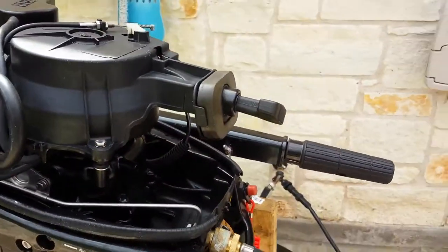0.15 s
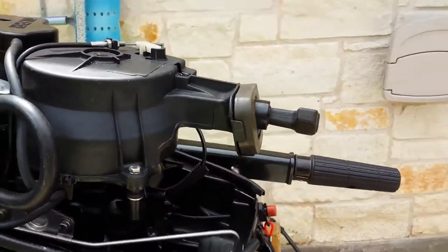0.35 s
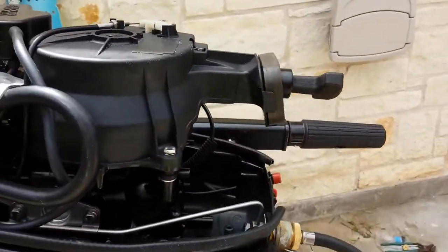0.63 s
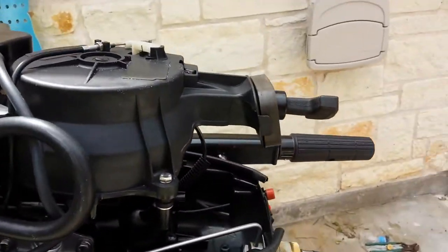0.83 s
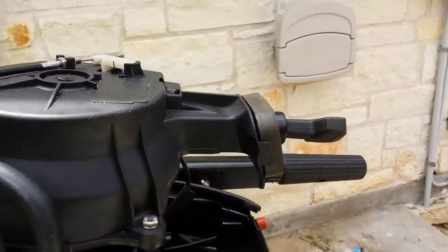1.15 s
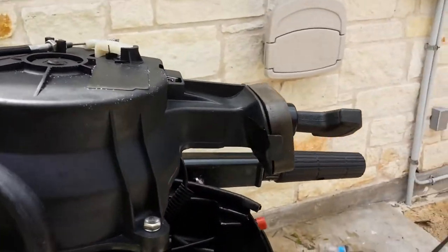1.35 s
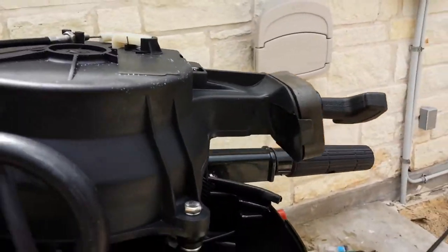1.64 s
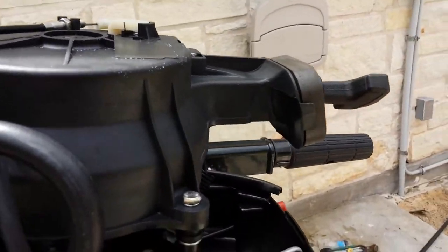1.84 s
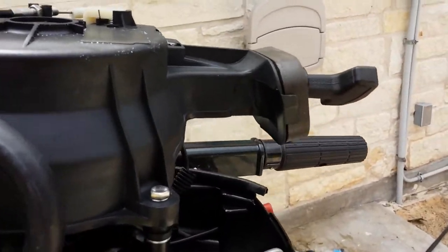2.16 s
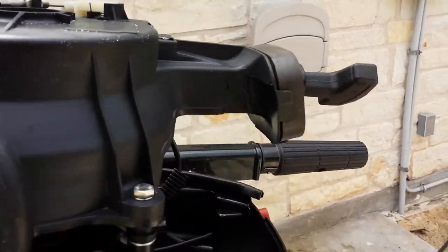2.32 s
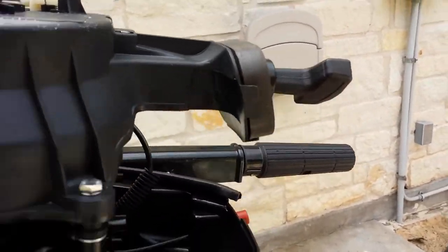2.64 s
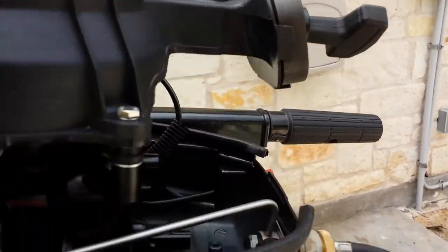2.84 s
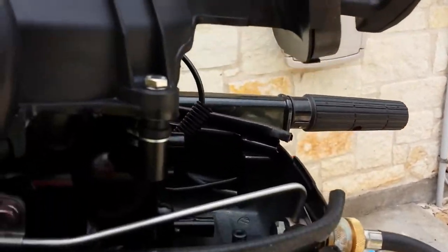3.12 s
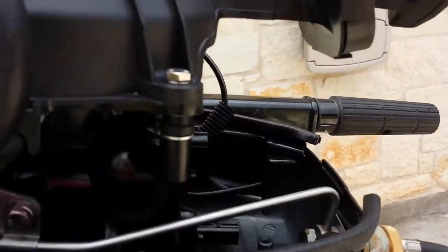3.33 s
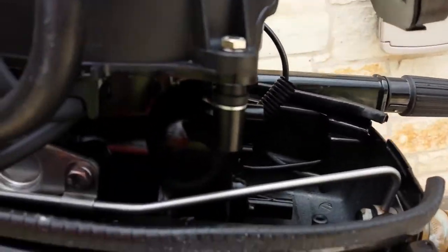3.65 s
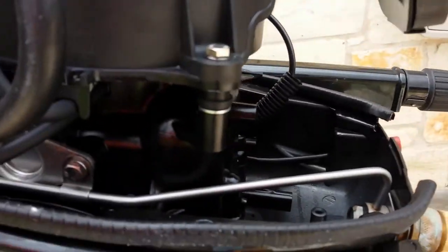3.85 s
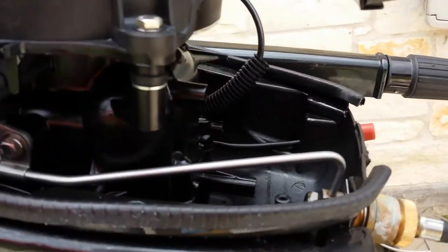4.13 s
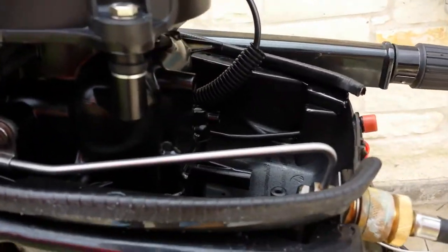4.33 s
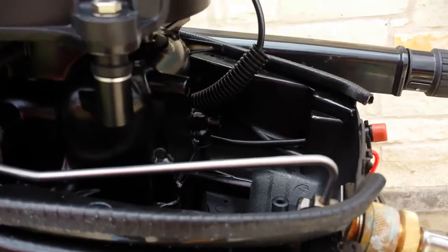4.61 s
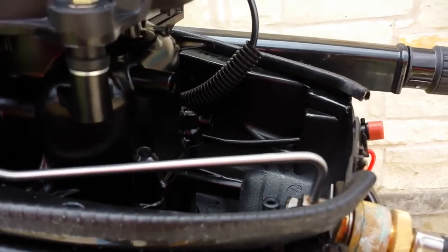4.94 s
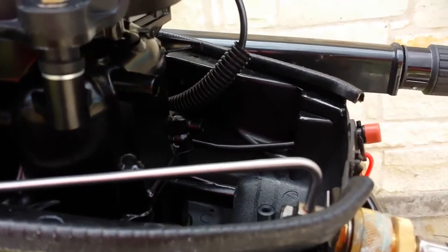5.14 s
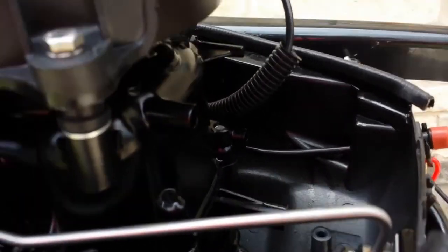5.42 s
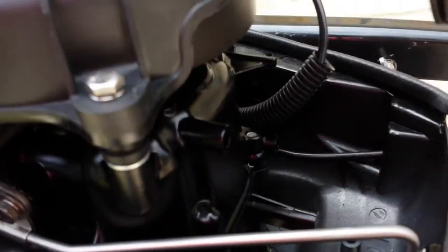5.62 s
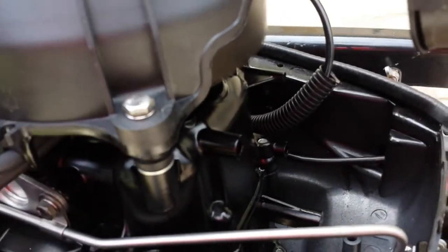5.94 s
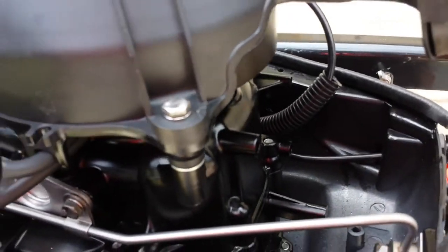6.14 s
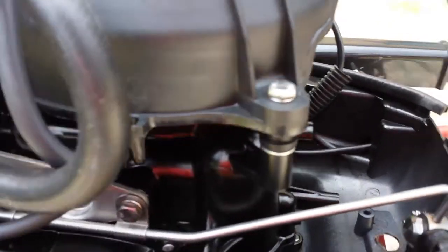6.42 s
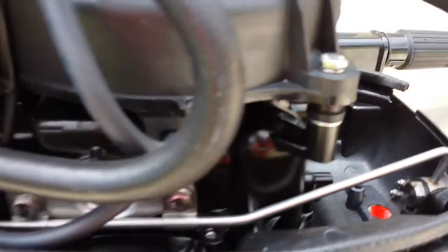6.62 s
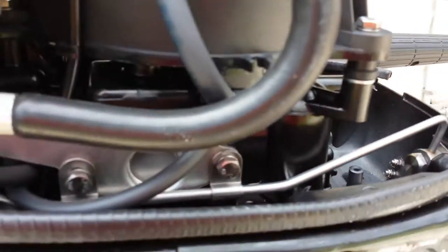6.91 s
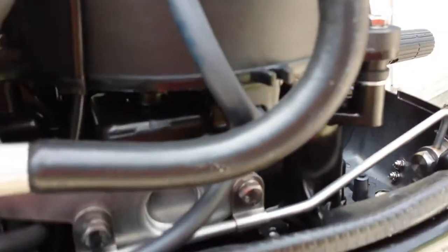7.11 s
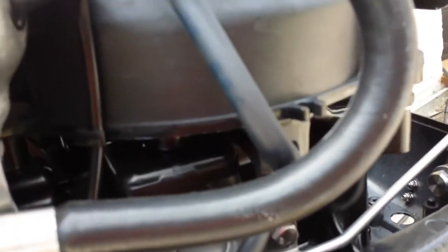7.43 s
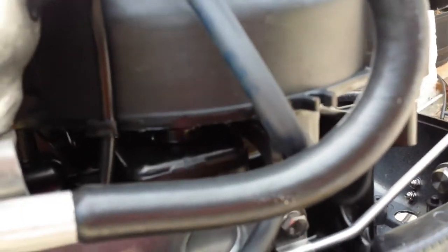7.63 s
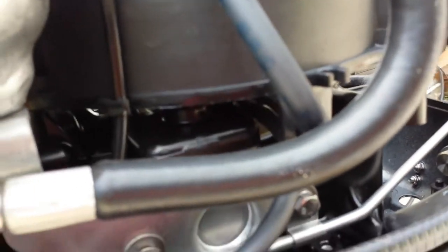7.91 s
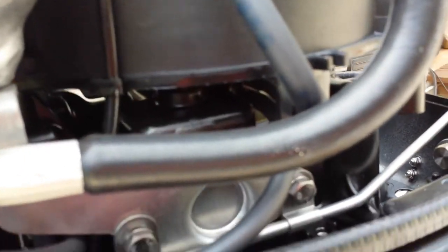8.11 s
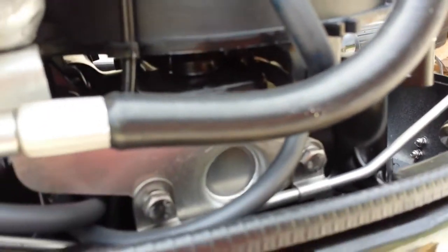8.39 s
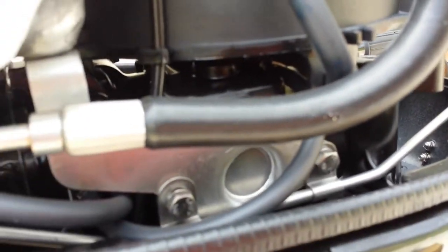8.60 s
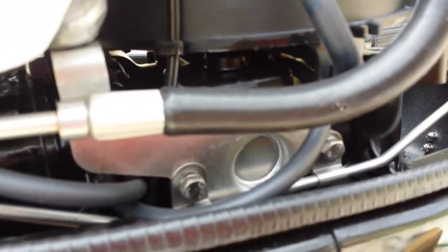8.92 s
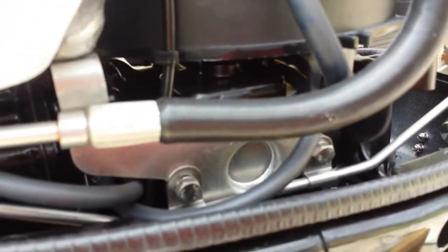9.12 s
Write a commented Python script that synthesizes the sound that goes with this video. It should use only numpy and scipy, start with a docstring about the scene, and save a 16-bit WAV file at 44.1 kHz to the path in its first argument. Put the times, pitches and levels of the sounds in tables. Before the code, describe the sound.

A small outboard engine idles steadily with a fast metallic clatter, ticking valves and a hiss, heard up close.

```python
"""A fast metallic clatter: a small four-stroke outboard idles with its cover off.
Piston, gears and valves strike at fixed points of every cycle and excite the resonances of the block.
Cooling water and intake air hiss, and periodic exhaust puffs hum in the leg. A hand-held microphone
with two ports moves round the engine past six viewpoints (0-5); two dull taps fall on its case."""
import sys
import numpy as np
from scipy import signal
from scipy.fft import rfft, irfft
from scipy.io import wavfile
from scipy.ndimage import uniform_filter1d

SR = 44100
rng = np.random.default_rng(int(sys.argv[2]) if len(sys.argv) > 2 else 0)


def generate_wav(signal):
    """Clip the signal to [-1, 1] and save it as 16-bit WAV at the path in sys.argv[1]."""
    frames = np.transpose(np.atleast_2d(signal))
    scaled = np.clip(frames, -1, 1) * 32767
    pcm = np.round(scaled).astype(np.int16)
    wavfile.write(sys.argv[1], SR, pcm)


N = 408366
FFT_SIZE = 8192
HZ = np.arange(FFT_SIZE // 2 + 1) * SR / FFT_SIZE


# Impacts on the block: (phase [cycles], level at each viewpoint [dB])
BLOCK_IMPACTS = [(-0.108, 0.9, 3.9, 9.6, 1.0, 7.5, 10.0), (-0.048, 7.8, 7.8, 7.7, 6.8, 5.1, 6.6),
                 (0.067, 3.2, 3.0, 6.8, -0.7, -3.2, 3.7), (0.125, -8.9, -6.6, 3.4, 2.2, 2.9, 5.7),
                 (0.207, 7.4, 4.1, 8.4, 4.4, 4.9, 7.8), (0.267, 4.2, -1.3, 6.4, 10.1, 1.4, 7.1),
                 (0.317, 1.7, -10.1, -20.0, -20.0, -0.1, -0.3), (0.5, 0.1, -3.5, 0.6, 2.6, -4.0, 0.7),
                 (0.551, 4.7, 1.5, 4.6, 0.7, -2.3, -4.3), (0.602, 9.2, 6.1, 8.5, 6.5, 4.4, 4.2),
                 (0.694, -1.7, -1.7, 0.9, 2.3, -3.6, 0.4), (0.852, -20.0, -0.3, -7.5, -20.0, -0.7, 3.4)]
# Block response, one curve a viewpoint: (frequency [Hz], gain [dB])
BLOCK_SPECTRA = [
    [(140, -45), (230, -19), (499, -16.5), (562, -21), (761, -6), (1010, -6.5), (1280, -1), (2400, -5),
     (3120, -34), (5280, -120)],
    [(140, -49), (230, -20.5), (361, -23), (562, -20), (1270, -3.5), (1900, -8.5), (1990, 3.5),
     (2400, -14.5), (3120, -22), (5280, -120)],
    [(140, -45), (230, -14), (280, -24), (312, -25.5), (754, -11.5), (1130, -8.5), (1510, 1.5), (2400, -7),
     (3120, -29), (5280, -120)],
    [(140, -58), (230, -20.5), (485, -19), (684, -13), (761, -8.5), (1000, -11), (1590, -0.5), (2400, -4),
     (3120, -19), (5280, -120)],
    [(140, -60), (230, -23), (475, -20), (732, -14), (1060, -5.5), (1160, -5), (2090, 0), (2400, -7),
     (3120, -15), (5280, -120)],
    [(140, -46), (230, -17), (530, -17), (1030, -2.5), (1170, -10.5), (1500, 3), (1620, -1), (2400, -3),
     (3120, -22), (5280, -120)],
]
# Peaks and dips of the castings: (frequency [Hz], width [Hz], gain at each viewpoint [dB])
CASTING_MODES = [(318, 41, -10, 1.5, 7, 5, -1, -1), (496, 28, 10, 1.5, 0.5, 2, 11, 4.5),
                 (797, 35, 4, 3.5, 3, 3.5, 2, 1.5), (1078, 51, 8.5, 9, 6, 7, 12, 8.5),
                 (1108, 100, -6, -7, -3, -0.5, -13, 0.5), (1288, 55, 6, -1, 2, 1.5, -2, 0),
                 (1653, 100, 11, 2, 0.5, 3, -2, 0.5), (2144, 16, 15, -3, 12.5, 4, 1, 1),
                 (2334, 25, 13, 13.5, 6, 6, 8, -3), (1256, 44, 1, 5, 4.5, 6, 6.5, 8),
                 (1550, 150, -1, 5, 0.5, 2.5, 4, 2), (1820, 26, 9, 14, -14, -0.5, 6, -1.5),
                 (1908, 51, 3, -27, -10, -13, -11, -11), (2120, 48, 5.5, 3, 5.5, 9.5, 8, 8)]
# Ring of the plate: (time [s], level [dB])
PLATE_LEVEL = [(0, -34), (.55, -31), (.69, -23.5), (.8, -28), (1.0, -21), (1.2, -20), (1.33, -22),
               (1.41, -26), (1.7, -23.5), (1.99, -20.5), (2.15, -26), (2.4, -26.5), (2.55, -24),
               (2.71, -33), (2.9, -24), (3.45, -35), (3.85, -25), (4.1, -32), (5.0, -34), (6.2, -30),
               (6.6, -30), (6.85, -24.5), (7.05, -18.5), (7.4, -26), (7.6, -31), (8.1, -27), (8.7, -25),
               (9.03, -19.5), (9.26, -23)]

def block(cycles, block_db, plate_hz=2032, plate_width_hz=14):
    """Impact excitation: piston and gears knock the castings, and one thin plate resonates."""
    knocks = impacts(cycles, BLOCK_IMPACTS, spread_db=1, click_db=11, steady_db=-3.5,
                     rise_s=.0028, t60=.024, repeats=from_db(-11) * cyclic_noise(cycles))
    shaking = rng.standard_normal((2, N)) + from_db(-5) * cyclic_noise(cycles, memory=.9)
    force = knocks + butterworth(shaking, 2, 750, "low")   # the casing shakes evenly below the knocks
    low_trim_db = -4 / (1 + (HZ / 950) ** 3)   # turns down the low drone of the knocks and shaking
    body = radiate(force, with_peaks(BLOCK_SPECTRA, CASTING_MODES) + low_trim_db)
    radius, angle = np.exp(-np.pi * plate_width_hz / SR), 2 * np.pi * plate_hz / SR
    ring = signal.lfilter([1, 0, -1], [1, -2 * radius * np.cos(angle), radius ** 2], force[0])
    ring = unit_rms(ring / uniform_filter1d(ring ** 2, SR // 16) ** .38)   # evens out the ring
    ring_db = in_time(PLATE_LEVEL)[0] + 1.4 * drift(3.9)   # it comes in bursts
    return from_db(block_db + 2) * body + from_db(ring_db) * ring * from_db([[4], [-12.5]])


# Valve impacts: (phase [cycles], level at each viewpoint [dB])
VALVE_IMPACTS = [(-0.088, 4.0, 4.0, 3.0, 7.0, 4.0, 2.0), (-0.03, 5.8, 5.9, 6.7, 2.1, 5.3, 5.4),
                 (-0.005, 9.6, 7.6, 9.3, 14.2, 9.1, 4.9), (0.015, 4.8, -3.7, 7.7, -20.0, 7.3, 8.5),
                 (0.075, 0.2, -1.5, -19.9, 0.3, -5.3, 0.0), (0.195, 2.7, -1.8, 2.1, 7.4, 3.3, 4.7),
                 (0.229, 2.9, 2.9, 4.7, -0.9, -0.7, -9.4), (0.53, 4.6, 3.3, 4.7, 9.7, 5.8, 5.1),
                 (0.655, -3.3, -1.4, 1.2, 3.0, -0.2, 0.3), (0.69, 2.5, -5.2, 3.6, 6.0, 2.9, 5.0),
                 (0.73, -0.7, 3.0, 0.4, 0.5, 0.3, -22.0), (0.8, 0.0, 1.0, 0.0, 5.0, 2.0, 5.0)]
# Valve gear response, one curve a viewpoint: (frequency [Hz], gain [dB])
VALVE_SPECTRA = [
    [(1290, -23), (2200, 5.5), (2400, -2), (2500, 3), (3100, 0), (3360, 0), (3580, 1), (4600, -8),
     (5980, -32), (10100, -120)],
    [(1290, -43), (2200, -4), (2600, -1), (2950, -12), (3220, -7.5), (3650, -7), (4030, -25), (4600, -19),
     (5980, -30), (10100, -120)],
    [(1290, -40.5), (2200, -3.5), (2410, -7), (2620, 1.5), (3060, -7.5), (3550, -7), (3830, -8),
     (4600, -19), (5980, -35), (10100, -120)],
    [(1290, -24), (2200, -8), (2460, 5.5), (2590, -11), (2980, 4), (3470, 0), (3930, -14.5), (4600, -15.5),
     (5980, -13), (10100, -120)],
    [(1290, -27), (2200, -14), (2580, 1.5), (2860, -6), (3130, -4), (3640, -0.5), (4140, -18), (4600, -8.5),
     (5980, -41), (10100, -120)],
    [(1290, -33.5), (2200, 0), (2560, -9), (2760, -7), (3200, -1), (3460, -4), (3760, -7), (4600, -17.5),
     (5980, -24), (10100, -120)],
]
# Peaks and dips of valve gear and airways: (frequency [Hz], width [Hz], gain at each viewpoint [dB])
UPPER_MODES = [(2560, 110, -7, 0, 1.5, -4, -1, 6.5), (2830, 100, -3, 1, -8, 0, -5, -1),
               (3150, 76, 2, 4, 4.5, -5, 4, 3.5), (3420, 100, 3, -3, -4, 4.5, -10, -5.5),
               (3680, 400, 1.5, 2, 4, 8.5, -0.5, 3.5), (5460, 98, -8, 3, -11, -5, 0, 5),
               (6480, 440, 0.5, 10.5, -2.5, -0.5, 7.5, -1), (11270, 900, 3, -3, -17, 3, 12, 11.5)]
# Valve gear: (level at each viewpoint [dB])
VALVE_LEVELS = [-24.5, -25.5, -26.5, -24.5, -26.5, -25.5]

def valve_gear(cycles, block_db):
    """Brief contact gives a wide spectrum: the valves seat with sharp, even ticks."""
    pattern = from_db(2) * cyclic_noise(cycles, memory=.88, size=600)
    ticks = impacts(cycles, VALVE_IMPACTS, spread_db=.7, click_db=16, steady_db=-6,
                    rise_s=.0015, t60=.019, repeats=pattern)
    level_db = by_viewpoint(VALVE_LEVELS) + .54 * (block_db + 23.5)   # partly follows the block
    return from_db(level_db + .83) * radiate(ticks, with_peaks(VALVE_SPECTRA, UPPER_MODES))


# Modes of small parts: (frequency [Hz], decay time T60 [s], level at each viewpoint [dB])
PART_MODES = [(4110, 0.036, -38, -44, -30, -30, -40, -36), (4400, 0.027, -40, -42, -38, -25, -34, -34),
              (5390, .035, -41, -37.5, -35, -39, -32, -26.5), (6020, .025, -27, -29, -35.5, -33, -38, -38)]

def small_parts(cycles, strike_phase=-.012, spread_db=3.5):
    """Free vibration: once a cycle the hardest valve seat rings each part, mostly on the left."""
    strikes = np.interp(np.arange(1, int(cycles[-1])) + strike_phase, cycles, np.arange(N)).astype(int)
    rings = np.zeros(N)
    for hz, t60, *levels_db in PART_MODES:
        strike_db = by_viewpoint(levels_db)[strikes] + spread_db * rng.standard_normal(len(strikes))
        clicks = np.full(N, 1e-18)
        clicks[strikes] = from_db(strike_db) * rng.choice([-1, 1], len(strikes))
        radius, angle = from_db(-60 / (t60 * SR)), 2 * np.pi * hz / SR
        rings += signal.lfilter([0, np.sin(angle)], [1, -2 * radius * np.cos(angle), radius ** 2], clicks)
    return rings * from_db([[4.5], [-9]])


# Swells of the main and the top band: (phase [cycles], level at each viewpoint [dB])
HISS_SWELLS = [(-0.075, 7.8, 5.5, 12.0, 5.4, 6.2, 8.1), (0.005, 9.5, 6.7, 11.6, 4.9, 7.3, 9.0),
               (0.085, 3.8, 7.7, 4.7, 4.1, 4.4, 5.2), (0.12, 9.0, 6.1, -20.0, -20.0, -5.3, 4.2),
               (0.205, 8.5, 6.0, 10.7, 1.5, 5.2, 5.3), (0.259, 3.8, -0.9, 7.2, 8.3, -3.4, -9.8),
               (0.345, 4.2, 1.0, 3.1, -1.0, 0.9, 2.9), (0.495, -20.0, -20.0, 6.0, -6.2, -8.1, 2.0),
               (0.55, 5.0, 1.9, -20.0, -0.5, 3.2, 3.5), (0.645, 2.4, -2.8, 3.9, 1.6, 0.6, 2.6),
               (0.74, 5.5, 2.8, 3.6, 2.6, 4.2, 5.5), (0.8, 5.9, 4.0, -10.8, -5.2, 1.3, -1.8)]
TREBLE_SWELLS = [(-0.08, -9.5, -9.5, 0, -11.0, -12.5, -12.5), (-0.01, -5.5, -7, -4.5, -10.5, -6.5, -6.5),
                 (0.08, 7, 7, 5, 5, 8, 10.5), (0.21, -10.0, -10.5, -9.5, -12.0, -12.5, -12.0),
                 (0.29, -9.5, -8.0, -7.5, -8.5, -10.0, -10.0), (0.38, -8.0, -1, -7.0, 5, 1, 0),
                 (0.53, 4, -4, -9.0, -6.5, -7.5, -9.5), (0.61, -8.0, -8.5, -8.0, -6.5, 2.0, -7.5),
                 (0.71, 2.5, -7, -4, 7, 4, 4), (0.8, 1.5, -3, 9, 1, -4.5, -4.5)]
# Main band, one curve a viewpoint, and top band, one for all: (frequency [Hz], gain [dB])
HISS_SPECTRA = [
    [(2350, -26), (4000, -3), (5390, -3.5), (5850, 3), (6530, 2.5), (7530, -1), (8190, -1.5), (10000, -18),
     (13000, -57), (22000, -120)],
    [(2350, -33), (4000, -4.5), (5090, -5), (6430, -2), (7140, -7), (7980, -1), (8550, -12), (10000, -14),
     (13000, -42), (22000, -120)],
    [(2350, -40), (4000, -9), (4850, -1.5), (6010, 0), (7760, -9), (8160, -11.5), (9120, -11), (10000, -26),
     (13000, -40), (22000, -120)],
    [(2350, -27), (4000, -12), (4500, -2), (4750, -7), (5390, -5.5), (6190, -4), (7950, -7), (10000, -21),
     (13000, -67), (22000, -120)],
    [(2350, -23), (4000, -1), (4160, -3), (4570, -1), (5050, 1), (6560, -2), (8130, 0), (10000, -11),
     (13000, -67), (22000, -120)],
    [(2350, -6.5), (4000, -6.5), (4420, -2.5), (5390, -2.5), (5820, -0.5), (6580, 3), (9330, -9.5),
     (10000, -18), (13000, -37), (22000, -120)],
]
TREBLE_SPECTRUM = [(7000, -42), (9200, -0.5), (10000, -4), (11700, -3), (12100, -11), (14400, -4.5),
                   (15200, -11)]
# Main band, and its steady part against its swells: (level at each viewpoint [dB])
HISS_LEVELS = [-29.5, -30.5, -31, -31, -32, -30.5]
HISS_FLOOR = [0.5, 0.5, -1.5, 1.0, 1, 0.5]

def air_and_water(cycles, treble_db):
    """Modulated flow noise: air and cooling water hiss, swelling with each contact; the top flickers."""
    main = impacts(cycles, HISS_SWELLS, spread_db=1.8, click_db=4, steady_db=by_viewpoint(HISS_FLOOR),
                   rise_s=.0045, t60=.015)
    top = impacts(cycles, TREBLE_SWELLS, spread_db=2.5, click_db=-5, steady_db=-3, rise_s=.0027, t60=.025)
    main = radiate(main, with_peaks(HISS_SPECTRA, UPPER_MODES))
    top = radiate(top, with_peaks([TREBLE_SPECTRUM] * len(HISS_SPECTRA), UPPER_MODES))
    main_db = by_viewpoint(HISS_LEVELS) + .3 * (treble_db + 44)   # partly follows the top band
    return from_db(main_db + .74) * main + from_db(treble_db + 2 * drift(10)) * top


# Exhaust harmonics: (multiple of the cycle rate, relative level [dB])
HARMONICS = [(1, -62), (2, -52.5), (3, -77), (4, -57.5), (5, -75), (6, -55.5), (7, -55.5), (8, -50.5),
             (9, -33.5), (10, -42), (11, -46.5), (12, -52.5), (13, -85), (14, -65), (15, -72), (16, -58),
             (17, -51), (18, -56), (20, -87), (22, -57.5), (24, -52), (26, -47.5), (28, -51.5), (32, -50),
             (35, -47), (38, -48.5), (42, -47.5)]
# Harmonics that vary round the engine: {multiple: (gain at each viewpoint [dB])}
HARMONIC_GAINS = {2: [-3, -3, 0, -3, 1, 1], 4: [-1, -4, 0, 2.5, -7, -14], 26: [1, 3.5, -2.5, 5.5, 0.5, -1],
                  32: [7, 12, -26, -13, -5, -19], 35: [-2, 0, -10, 1, -13, -5], 38: [-3, 2, 1, -1.5, -4,
                  10.5], 42: [-3, -6, -3, 9, 3, -0.5]}
# Hum and rumble: (level at each viewpoint [dB])
HUM_LEVELS = [-34.5, -34, -36.5, -36.5, -34.5, -36]
RUMBLE_LEVELS = [-42.5, -44, -45.5, -42.5, -46.5, -45]

def exhaust(cycles, puff_phase=.243, waver_db=3.5):
    """Harmonic series: one puff a cycle through the leg makes a hum, over a soft rumble."""
    step = 10   # samples between computed points of the hum
    phase = (cycles + .003 * drift(5.7))[::step] - puff_phase   # puffs come a little early or late
    loudest_db = max(level_db for _, level_db in HARMONICS)
    hum = 0
    for k, level_db in HARMONICS:
        weakness = min((loudest_db - level_db) / 20 + .48, 1)   # weak harmonics waver most,
        midrange = min(k / 8.8, 1, 16 / k)   # low and high ones less
        gain_db = level_db - loudest_db + waver_db * weakness * midrange * drift(6, step)
        gain_db += by_viewpoint(HARMONIC_GAINS.get(k, np.zeros(6)), step)
        lag = np.pi * (k > 8.5)   # half a wave from the leg resonance up
        hum += from_db(gain_db) * np.cos(2 * np.pi * k * phase + lag)
    hum = np.interp(np.arange(N) / step, np.arange(len(hum)), hum)
    hum = np.sqrt(2) * from_db(by_viewpoint(HUM_LEVELS)) * hum * from_db([[.8], [-.8]])
    mid, side = butterworth(rng.standard_normal((2, N)), 2, (55, 245), "band")
    rumble = unit_rms(mid + .47 * side * [[1], [-1]])
    return hum + from_db(by_viewpoint(RUMBLE_LEVELS)) * rumble


# Taps on the microphone's case: (time [s], level [dB], frequency [Hz], decay time T60 [s])
CASE_TAPS = [(.3903, -3.5, 300, .036), (1.057, -20, 160, .09)]

def case_taps():
    """Damped oscillation: a soft blow rings the case, with a knock above, a thud below and rebounds."""
    out, t = np.zeros(N), np.arange(SR // 10) / SR
    attack = 1 - np.exp(-t / .0008)
    for start_s, level_db, hz, t60 in CASE_TAPS:
        phase = hz * (t + .0006 * (1 - np.exp(-t / .001)))   # the note drops just after the blow
        ring = from_db(-60 * t / t60) * np.sin(2 * np.pi * phase)
        knock = .22 * from_db(-110 * t / t60) * np.sin(2 * np.pi * 1.55 * hz * t)
        thud = .17 * from_db(-60 * t / .13) * np.sin(2 * np.pi * 140 * t)
        for delay_s, rebound_db in [(0, 0), (.012, -16), (.0215, -17), (.032, -15), (.049, -19)]:
            at = int((start_s + delay_s) * SR)
            out[at:at + len(t)] -= from_db(level_db + 3 + rebound_db) * attack * (ring + knock + thud)
    return butterworth(out, 2, 75, "high")


def impacts(cycles, contacts, spread_db, click_db, steady_db, rise_s, t60, repeats=0):
    """Incoherent powers add: each contact gives a click and a dying rattle over a steady one."""
    table = np.array(contacts)
    cycle_numbers = np.arange(int(cycles[-1]) + 2)[:, None]
    scatter = rng.standard_normal((len(cycle_numbers), len(table), 2))
    phases = cycle_numbers + table[:, 0] + .004 * scatter[..., 0]
    onsets = np.interp(phases, cycles, np.arange(N), left=-1, right=-1).astype(int)
    viewpoint = in_time(MIC_PATH)[0][onsets]
    level_db = sum(nearness(viewpoint, k) * column for k, column in enumerate(table[:, 1:].T))
    clicks = np.zeros(N)
    clicks[onsets[onsets > 0]] = from_db(level_db + spread_db * scatter[..., 1])[onsets > 0]
    rattle_power = signal.lfilter([1], [1, -from_db(-120 / (t60 * SR))], clicks ** 2 + 1e-18)
    rattle_power = uniform_filter1d(rattle_power, int(rise_s * SR) + 1)   # play is taken up gradually
    power = np.abs(rattle_power) + from_db(2 * (steady_db + 2.14 * drift(44)))
    return np.sqrt(power) * (rng.standard_normal((2, N)) + repeats) + from_db(click_db) * clicks


def cyclic_noise(cycles, memory=.797, size=160):
    """Periodicity gives spectral lines: noise of size points a cycle returns nearly alike each time."""
    fresh = rng.standard_normal((2, int(cycles[-1]) + 60, size))
    patterns = signal.lfilter([np.sqrt(1 - memory ** 2)], [1, -memory], fresh, axis=1)
    patterns = patterns[:, 50:].reshape(2, -1)
    return np.array([np.interp((cycles + 1) * size, np.arange(len(p)), p) for p in patterns])


# Path of the microphone: (time [s], viewpoint [0-5])
MIC_PATH = [(0, -0.5), (.5, 1.5), (1.0, 1), (2.5, 1.5), (3.0, 2), (4.1, 2.5), (4.5, 3.5), (6.25, 3),
            (6.55, 4), (7.5, 4.5), (7.75, 5), (9.26, 5)]
# Shading of the right port, one curve a viewpoint: (frequency [Hz], left minus right [dB])
PORT_SHADOW = [
    [(60, 2.5), (120, 4), (240, 2.0), (470, 2), (940, 2), (1880, 11), (3740, 13), (7440, 17), (14800, -15)],
    [(60, 3.0), (120, 0), (240, 7), (470, -1), (940, 4), (1880, 14), (3740, 13.5), (7440, 14.5),
     (14800, -2)],
    [(60, 4), (120, 4), (240, 0), (470, 2), (940, 2.5), (1880, 14.5), (3740, 11), (7440, 16), (14800, -9)],
    [(60, -1), (120, -10), (240, -1), (470, 0), (940, 2.5), (1880, 9), (3740, 16.5), (7440, 16.5),
     (14800, -19)],
    [(60, 11), (120, 1.5), (240, 4), (470, 0), (940, 4), (1880, 12.5), (3740, 14), (7440, 13.5),
     (14800, -7)],
    [(60, 9), (120, 9), (240, 3.5), (470, 1), (940, 6), (1880, 11.5), (3740, 13), (7440, 13), (14800, -5)],
]
# Right port against the left: (frequency [Hz], coherence [0-1], phase lead [rad])
PORT_COHERENCE = [(30, .4, 0), (70, 0.3, 0), (160, 1, 0.089), (500, 0.92, 0.33), (1030, 0.75, 0),
                  (2020, 0.8, 1.7), (4000, 0.4, 1.65), (14000, .22, 1.4)]

def radiate(source, gains_db, ahead=256):
    """Transfer paths, cross-faded by viewpoint: the right port is shaded and only partly coherent."""
    viewpoint, out = in_time(MIC_PATH)[0], np.zeros((2, N))
    coherence = np.clip(at_hz(PORT_COHERENCE, HZ), 0, 1)
    lead = np.exp(1j * at_hz(PORT_COHERENCE, HZ, column=2))
    for k, gain_db in enumerate(gains_db):
        share = nearness(viewpoint, k)
        first, last = np.flatnonzero(share)[[0, -1]]
        shade = from_db(-at_hz(PORT_SHADOW[k], HZ))
        response = minimum_phase(gain_db - 10 * np.log10(1 + shade ** 2))
        paths = [response, response * shade * coherence * lead,
                 response * shade * np.sqrt(1 - coherence ** 2)]
        impulses = np.roll(irfft(paths, FFT_SIZE), ahead, axis=1)[:, :FFT_SIZE // 4]
        heard = signal.oaconvolve(source[[0, 0, 1], first:last] * share[first:last], impulses, axes=1)
        left, right_coherent, right_incoherent = heard[:, ahead:ahead + N - first]
        ports = np.array([left, right_coherent + right_incoherent])
        rms = np.sqrt(np.sum(ports.mean(axis=0) ** 2) / np.sum(share ** 2))
        out[:, first:first + len(left)] += ports / rms
    return out


def nearness(viewpoint, k):
    """Linear cross-fade weight of viewpoint k."""
    return np.clip(1 - np.abs(viewpoint - k), 0, 1)


def by_viewpoint(levels_db, step=1):
    """Levels interpolated along the microphone's path, one every step samples."""
    viewpoint = np.interp(np.arange(0, N, step) / SR, *np.transpose(MIC_PATH))
    return np.interp(viewpoint, np.arange(len(levels_db)), levels_db)


def with_peaks(spectra, modes):
    """Resonance curves add narrow peaks and dips to each viewpoint's spectrum, in dB."""
    peaks_db = sum(np.array(gains_db)[:, None] / (1 + (2 * (HZ - hz) / width_hz) ** 2)
                   for hz, width_hz, *gains_db in modes)
    return np.array([at_hz(spectrum, HZ) for spectrum in spectra]) + peaks_db


def minimum_phase(gain_db):
    """Causality: a response with this gain curve that never rings before a blow."""
    cepstrum = irfft(gain_db * np.log(10) / 20, FFT_SIZE)
    cepstrum[1:FFT_SIZE // 2] *= 2
    cepstrum[FFT_SIZE // 2 + 1:] = 0
    return np.exp(rfft(cepstrum))


def drift(rate_hz, step=1):
    """Low-passed noise of rms 1, one value every step samples."""
    pole = np.exp(-80 * np.pi * rate_hz / SR)
    slow = signal.lfilter([1], [1, -2 * pole, pole ** 2], rng.standard_normal(N // 40 + 2002))[2000:]
    return np.interp(np.arange(0, N, step) / 40, np.arange(len(slow)), unit_rms(slow))


def butterworth(x, order, hz, kind):
    """Filter with a maximally flat passband."""
    return signal.sosfilt(signal.butter(order, hz, kind, fs=SR, output="sos"), x)


def from_db(db):
    """Decibels to amplitude ratio."""
    return np.exp(np.asarray(db) * (np.log(10) / 20))


def unit_rms(x):
    """Scale so that the mean of the channels has rms 1."""
    return x / np.sqrt(np.mean(np.mean(np.atleast_2d(x), axis=0) ** 2) + 1e-20)


def in_time(rows):
    """Columns of a time table, interpolated to one value a sample."""
    times, *columns = np.transpose(rows)
    return [np.interp(np.arange(N) / SR, times, column) for column in columns]


def at_hz(points, hz, column=1):
    """A spectrum interpolated on a log-frequency axis."""
    table = np.array(points)
    return np.interp(np.log(hz + 1), np.log(table[:, 0]), table[:, column])


# Crankshaft: (time [s], speed [rev/min])
CRANK_SPEED = [(0.0, 2257.1), (0.37, 2270.3), (0.74, 2298.2), (1.11, 2271.0), (1.48, 2258.6),
               (1.85, 2240.8), (2.22, 2228.1), (2.59, 2235.3), (2.96, 2216.1), (3.33, 2164.2),
               (3.7, 2153.7), (4.07, 2195.8), (4.44, 2171.9), (4.82, 2175.8), (5.19, 2166.6),
               (5.56, 2246.1), (5.93, 2221.7), (6.3, 2185.8), (6.67, 2236.0), (7.04, 2205.7),
               (7.41, 2193.9), (7.78, 2168.7), (8.15, 2156.7), (8.52, 2163.1), (8.89, 2168.1),
               (9.26, 2150.0)]
# As the microphone moves: (time [s], block level [dB], top band of the hiss [dB])
PATH_LEVELS = [(0, -15.5, -44), (.15, -23.5, -50), (.45, -21.5, -40), (.9, -22, -40.5), (1.9, -22, -41.5),
               (2.76, -24.5, -42), (2.94, -25, -64), (3.45, -23.5, -55.5), (3.8, -22.5, -49),
               (4.35, -22, -57.5), (4.85, -23, -52.5), (5.5, -25.5, -57.5), (6.3, -24, -50.5),
               (6.75, -22.5, -45), (7.5, -23, -40.5), (7.8, -21.5, -36.5), (8.1, -22, -37),
               (8.7, -24.5, -41), (9.26, -23.5, -39)]

def scene():
    """Superposition: the engine's sources, all timed by the crank, and the taps add at the two ports."""
    cycles = -.035 + np.cumsum(in_time(CRANK_SPEED)[0]) / (2 * 60 * SR)   # one cycle is two turns
    block_db, treble_db = in_time(PATH_LEVELS)
    clatter = block(cycles, block_db) + valve_gear(cycles, block_db)
    flow = air_and_water(cycles, treble_db) + exhaust(cycles)
    return clatter + flow + small_parts(cycles) + case_taps()


def record(dry, cutoff_hz=15550):
    """Soft saturation rounds the peaks near full scale; a steep low-pass cuts the top."""
    rounded = dry / (1 + np.abs(dry / .97) ** 4) ** .25
    return signal.sosfilt(signal.cheby2(12, 70, cutoff_hz, fs=SR, output="sos"), rounded)


dry = scene()
out = record(dry)
generate_wav(out)
```